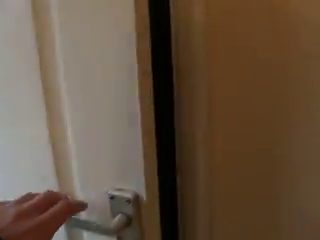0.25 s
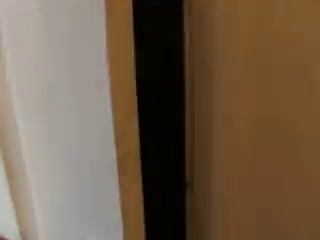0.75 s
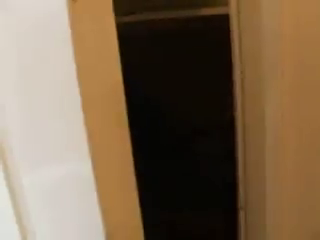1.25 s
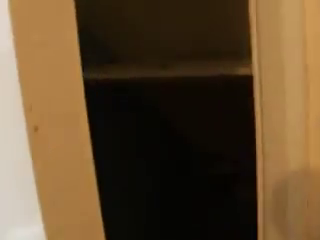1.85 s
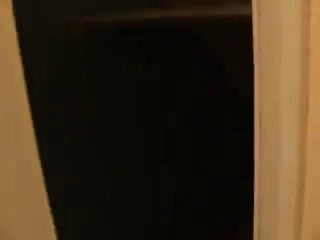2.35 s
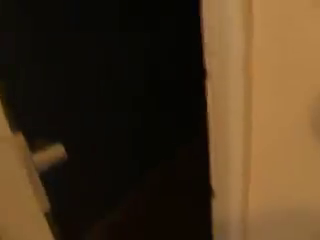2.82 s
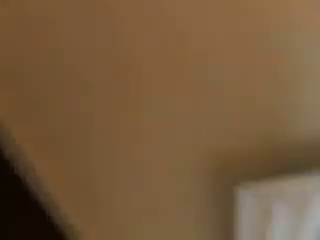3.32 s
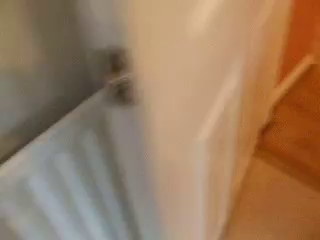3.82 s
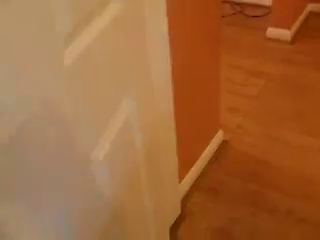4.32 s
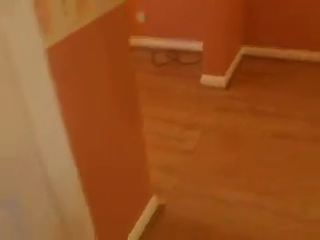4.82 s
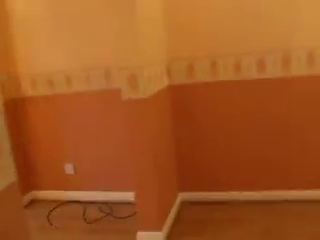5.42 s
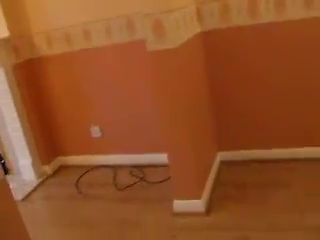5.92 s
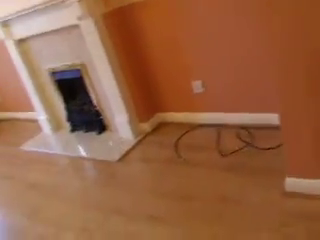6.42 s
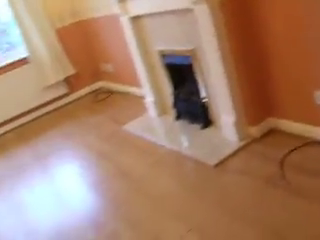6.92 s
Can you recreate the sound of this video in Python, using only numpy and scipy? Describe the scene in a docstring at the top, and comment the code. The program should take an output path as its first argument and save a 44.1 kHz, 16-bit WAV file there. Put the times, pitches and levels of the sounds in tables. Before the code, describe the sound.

Close to a handheld microphone, a metal door lever rubs and its latch snaps with a sharp, overloaded clack. The panel door bumps with small dry ticks. Cloth rustles and grip clicks follow as the person turns, then soft steps, a tiny sole squeak and a hollow heel knock on laminate, with slight indoor reverberation and faint hiss.

```python
"""In a small hall a lever handle is pressed, its latch snaps and a panel door swings; someone with a camera
then turns and walks onto a laminate floor. Rubs and the noisy tails of hits are swells of shaped noise, small
things tick through paired resonances or ring on one note, soft bumps are resonant noise, a sole squeaks in
slips, and the latch, door and heels ring as dying sines. The microphone hisses, dulls the treble and
overloads on the latch."""
import sys
import numpy as np
from scipy import signal
from scipy.io import wavfile
from scipy.ndimage import uniform_filter1d

SR = 44100
rng = np.random.default_rng(int(sys.argv[2]) if len(sys.argv) > 2 else 0)


def master(y):
    """Save y as 16-bit WAV."""
    cut = np.clip(np.atleast_2d(y).T, -1, 1)
    pcm = np.round(cut * 32767)  # scale
    wavfile.write(sys.argv[1], SR, pcm.astype(np.int16))


N = 315579  # length in samples


def gain_of(db):
    """Turns decibels into an amplitude factor."""
    return 10 ** (np.asarray(db) / 20)


def dying(t, t60):
    """Exponential decay that loses 60 dB in t60 seconds."""
    return gain_of(-60 * t / t60)


def evened(x):
    """Scales a sound to rms 1."""
    return x / np.sqrt(np.mean(x ** 2) + 1e-20)


def read(points, hz):
    """Reads a curve of straight lines on a log-frequency axis."""
    f, value = np.transpose(points)
    return np.interp(np.log(hz + 1), np.log(f + 1), value)


def add(mix, s, sound):
    """Mixes a sound in at s seconds, cut off at the end of the mix."""
    part = mix[round(s * SR):][:len(sound)]
    part += sound[:len(part)]


def band(x, hz, share):
    """One resonance around hz; share is its bandwidth over its centre frequency."""
    q = 1 / np.clip(share, 1 / 20, 2)
    b, a = signal.iirpeak(min(hz, SR / 3), q, SR)
    return signal.lfilter(b, a, x)


def noise(spectrum, patchy_db):
    """Random short-time spectra whose level drifts in patches of time and frequency; rms 1."""
    hz = np.fft.rfftfreq(512, 1 / SR)
    real, imaginary, patches = rng.standard_normal((N // 128 + 5, 257, 3)).T
    patches = uniform_filter1d(patches, size=7, axis=0)  # across frequency
    patches = evened(uniform_filter1d(patches, size=20, axis=1))  # across time
    level_db = read(spectrum, hz)[:, None] + patchy_db * patches
    z = (real + 1j * imaginary) * gain_of(level_db)
    return evened(signal.istft(z, nperseg=512, noverlap=384)[1][:N])


def ring(modes, tilt_db, scatter_db):
    """Dying sines, peak 1, tilted per octave; each blow lands on another spot, so the strengths scatter."""
    hz, db, t60 = np.transpose(modes)[:, :, None]
    t = np.arange(SR // 3) / SR
    spot_db = scatter_db * rng.standard_normal(hz.shape) + tilt_db * np.log2(hz / hz.mean())
    partials = gain_of(db + spot_db) * dying(t, t60) * np.sin(2 * np.pi * hz * t)
    sound = partials.sum(0)
    return sound / abs(sound).max()


def swell(t, s, db, rise, fall):
    """Power that climbs 24.7 dB in the rise time up to moment s, then sinks 24.7 dB in the fall time."""
    away = np.maximum((s - t) / abs(rise), (t - s) / abs(fall))
    return gain_of(2 * db - 49.4 * away)  # doubled decibels give power


def rubs_and_tails():
    """Grainy bright and mid noise swells with rubs and hits over a faint steady stir; a rumble lies below."""
    # spectra of the bright, cloth-like noise and the mid, sole-like noise: pitch_hz, relative level_db per Hz
    bright_spectrum = [(1180, -16.5), (2000, -38), (2260, 0.5), (4380, 4), (6080, 5), (7470, 6),
                       (8280, -2.5), (8890, -67.5), (9300, -41.5), (12100, -72), (20500, -120)]
    mid_spectrum = [(400, -2.5), (800, 3.5), (1100, 2.5), (1500, 4), (2000, 4.5), (2400, 0), (3100, 0),
                    (4000, -16)]
    # swells of bright and mid noise: rubs of clothes and soles, and noisy tails of hits:
    # peak_s, bright_db, mid_db, rise_s, fall_s
    swells = [(0.348, -33, -56, 0.01, 0.019), (0.396, -30.5, -32, 0.026, 0.017), (.42, -46, -56, .03, 0.26),
              (.63, -63, -46.5, 0.045, 0.1), (1.012, -39.5, -44.5, 0.016, 0.17),
              (1.064, -40, -49, 0.0087, 0.51), (1.909, -45, -60, .008, .2), (2.03, -44.5, -56, 0.12, 0.035),
              (2.565, -38.5, -53, 0.044, 0.13), (2.62, -34.5, -50, .02, 0.18),
              (2.66, -35.5, -45, 0.11, 0.15), (2.96, -41, -46.5, 0.13, 0.24),
              (3.16, -42.5, -44, 0.43, 0.55), (3.35, -60, -47, 0.14, 0.11), (3.496, -39.5, -47, .008, 0.18),
              (4.244, -37, -46, .03, 0.36), (4.3, -32.5, -37.5, 0.12, 0.3),
              (4.38, -32.5, -37.5, 0.25, 0.28), (4.74, -44.5, -45, 0.067, 0.3),
              (4.9, -49, -45.5, 0.26, 0.43), (5.01, -39, -39, 0.1, 0.026),
              (5.14, -30.5, -27.5, 0.046, 0.022), (5.16, -42, -45, 0.46, 0.23),
              (5.34, -36.5, -38.5, 0.35, .2), (5.48, -40.5, -42, 0.19, 0.16), (5.84, -45.5, -45, 0.14, 1),
              (6.25, -33, -37.5, 0.31, 0.73), (6.46, -37.5, -40, 0.38, 0.74),
              (6.606, -30.5, -52, .008, 0.23), (6.65, -36.5, -59, 0.07, 0.41),
              (7.041, -56, -45.5, 0.14, .5)]
    # faint steady rubbing under them: time_s, bright_db
    stir_levels = [(0, -46.5), (.15, -51.5), (.8, -56), (1.3, -55), (1.7, -50.5), (2.4, -54.5), (2.85, -49),
                   (3.8, -55.5), (4.15, -54), (4.6, -49.5), (5.6, -48.5), (6.8, -51), (7.16, -49.5)]
    # low rumbles as the camera is jolted: peak_s, level_db
    jolts = [(1.09, -42), (1.53, -52), (2.07, -46), (4.88, -49), (5.15, -53), (5.8, -52), (6.42, -46),
             (6.62, -51), (6.979, -59)]
    stir_mid_db = -2  # mid against bright noise in the steady rubbing
    jolt_rise_s, jolt_fall_s, rumble_db = 0.13, 0.2, -70

    t = np.arange(N) / SR
    coarse = np.arange(0, N + 32, 32) / SR  # levels move slowly enough for every 32nd sample
    stir = gain_of(2 * np.interp(coarse, *np.transpose(stir_levels)))
    bright_power = stir
    mid_power = stir * gain_of(2 * stir_mid_db)
    for s, bright_db, mid_db, rise, fall in swells:
        bright_power = bright_power + swell(coarse, s, bright_db, rise, fall)
        mid_power = mid_power + swell(coarse, s, mid_db, rise, fall)
    low_power = gain_of(2 * rumble_db)
    for s, db in jolts:
        low_power = low_power + swell(coarse, s, db, jolt_rise_s, jolt_fall_s)

    grain = gain_of(0.93 * evened(uniform_filter1d(rng.standard_normal(N), size=150)))
    bright = grain * noise(bright_spectrum, patchy_db=1.5)
    mid = grain * noise(mid_spectrum, patchy_db=1.66)
    below_45_hz = signal.butter(3, 45., fs=SR, output="sos")
    low = evened(signal.sosfilt(below_45_hz, rng.standard_normal(N)))
    layers = (bright_power, bright), (mid_power, mid), (low_power, low)
    return sum(np.interp(t, coarse, np.sqrt(power)) * x for power, x in layers)


def ticks():
    """A sharp tap and a puff of noise through two resonances; a body that rings long is narrow."""
    # small dry ticks of grip, clothes and boards: start_s, peak_db, body_hz, edge_hz, edge_over_body_db
    taps = [(0.1203, -23, 2030, 4500, -4), (.235, -28.5, 810, 1820, -19), (1.0082, -15, 2530, 5730, 3),
            (1.0092, -23.5, 1300, 4000, 4), (1.014, -27, 2770, 4900, -1), (1.0663, -17, 1060, 5550, 2),
            (1.0698, -15.5, 1050, 5900, 3), (1.0732, -18.5, 1040, 7200, 5), (1.1438, -24.5, 2060, 900, -11),
            (1.9073, -28, 2230, 6900, 5), (2.005, -23, 2110, 5500, 1), (2.514, -31, 2200, 6000, 3),
            (2.9373, -17, 700, 5630, 4), (3.115, -19, 1890, 4800, -7), (3.153, -25, 1950, 4140, 17),
            (3.4914, -21, 2140, 5770, 6), (3.4947, -17, 2130, 7050, -0.5), (3.573, -30, 1320, 5200, -3),
            (3.677, -35, 1060, 1980, -3), (3.722, -25, 720, 2900, -7), (4.132, -35, 500, 1100, -7),
            (4.2385, -23.5, 1740, 2800, -5), (4.308, -25, 700, 1200, -7), (4.479, -10.5, 4900, 5870, 4),
            (4.4807, -11.5, 3280, 6600, -4), (4.487, -23, 3800, 6800, 6), (4.694, -22, 2020, 1220, -15),
            (4.725, -25, 2030, 1120, -8), (4.836, -25, 2100, 4600, 2), (4.889, -24, 600, 2490, 3),
            (4.9128, -21.5, 1140, 2280, -3), (4.92, -22, 856, 1870, 1), (4.947, -26, 2500, 4000, -1),
            (5.1194, -20, 1500, 600, -8), (5.1305, -24, 2380, 6030, -18), (5.137, -22, 1300, 7040, -18),
            (5.1409, -11, 1400, 2600, 3), (5.223, -22.5, 1040, 2020, -1), (5.435, -27, 1200, 1890, -5),
            (5.458, -25, 1920, 1000, -9), (5.499, -24, 1580, 890, -4.5), (5.8064, -30, 3100, 3580, -6),
            (5.8959, -20.5, 1500, 815, -6), (5.987, -27, 704, 1830, -3), (6.056, -34.5, 690, 1490, -12),
            (6.0788, -22, 1580, 910, 6), (6.1439, -23.5, 790, 1710, -16), (6.242, -17, 2220, 3800, 3),
            (6.409, -21, 1510, 5000, 9), (6.6015, -24, 1350, 6000, 4), (6.8053, -20, 810, 1560, -32)]
    t60_s, t60_per_db = .018, 0.04  # decay time at -22 dB; softer ticks ring longer
    out, t = np.zeros(N), np.arange(SR // 8) / SR
    for s, db, body_hz, edge_hz, edge_db in taps:
        t60 = t60_s * np.exp(-t60_per_db * (db + 22))
        puff = rng.standard_normal(len(t)) * dying(t, t60)
        drive = puff + 13 * (t == 0)  # the tap is a single sample

        def resonance(hz):
            """Two resonances in a row on one pitch, the narrower the longer the decay."""
            narrow = band(drive, hz, min(14 / (hz * t60), .85))
            return evened(band(narrow, hz, min(30 / (hz * t60), 1.1)))

        sound = resonance(body_hz) + gain_of(edge_db) * resonance(edge_hz)
        add(out, s, gain_of(db) * sound / abs(sound).max())
    return out


def pings():
    """Small hard parts ring on one dying note whose strength wavers."""
    # single notes: start_s, level_db, pitch_hz, t60_s
    notes = [(.2345, -47, 810, 0.038), (1.9075, -39.5, 2280, 0.089), (2.01, -39.5, 1750, 0.087),
             (5.806, -31.5, 3035, 0.064), (5.8064, -36, 2980, 0.23), (5.8065, -34, 3550, .06)]
    out, t = np.zeros(N), np.arange(SR // 6) / SR
    for s, db, hz, t60 in notes:
        waver = 1 + 3.0 * uniform_filter1d(rng.standard_normal(len(t)), size=120)
        add(out, s, gain_of(db) * dying(t, t60) * waver * np.sin(2 * np.pi * hz * t))
    return out


def latch():
    """Each strike rings the lock case, with a short crack of loose parts."""
    # latch parts striking: start_s, level_db, bright_share (of the thin bright parts, 0-1)
    strikes = [(0.338, -30, 0), (0.3454, -42, 1), (0.347, -30, 1), (0.354, -31, .6), (0.3645, -15, 1),
               (0.368, -19, 0), (0.3837, 5, 0.63), (0.3867, -7, 0.6), (0.3947, -12, 0.6),
               (0.3956, -19, 0.7), (.4095, -26, 0.6)]
    # modes of the lock case: pitch_hz, relative level_db, t60_s
    lock = [(1490, -11, 0.033), (1830, -19, 0.021), (1970, 0, 0.024), (2340, 4.5, 0.019),
            (2512, 7.5, 0.029), (2590, 0, 0.036), (2850, -7, 0.042), (3150, -18, 0.017), (3820, -2, 0.02),
            (4000, -10, 0.034), (4890, -0.5, .016), (5500, -3, 0.014), (6210, -2.5, 0.019),
            (6620, -1, 0.013), (7800, -29, .01)]
    out, t = np.zeros(N), np.arange(SR // 3) / SR
    for s, db, bright in strikes:
        crack = 0.49 * band(rng.standard_normal(len(t)), 4500, 0.74) * dying(t, 0.016)
        case = ring(lock, tilt_db=22 * (bright - .5), scatter_db=1)
        add(out, s, gain_of(db) * (case + crack))
    # small parts radiate neither bass nor the top treble
    radiated = signal.butter(2, [1000., 7200.], "band", fs=SR, output="sos")
    return signal.sosfilt(radiated, out)


def thuds():
    """Noise in one resonance that swells briefly and dies; the door panel, knocked once, also rings."""
    # soft bumps and brushes, and noisy tails of the latch and ticks:
    # start_s, level_db, pitch_hz, rise_s, t60_s
    bumps_and_tails = [(0.454, -45, 232, 0.011, 0.64), (.458, -42.5, 465, 0.0028, 0.62),
                       (0.399, -43, 5900, .005, 0.46), (.603, -36.5, 1220, 0.017, 0.24),
                       (1.066, -34, 1140, 0.0036, 0.44), (1.068, -35.5, 634, 0.0031, 0.46),
                       (1.066, -35, 323, 0.0022, 0.52), (1.084, -38, 130, .015, 0.71),
                       (1.079, -34.5, 69, 0.0061, 0.61), (1.898, -42, 237, 0.0032, 0.57),
                       (1.906, -44, 2260, .003, 0.36), (2.0, -46.5, 377, 0.012, 0.39),
                       (2.009, -47, 1730, 0.003, 0.33), (2.561, -40, 806, 0.008, 0.71),
                       (2.621, -35.5, 1310, 0.023, 0.28), (2.935, -34.5, 600, 0.004, 0.34),
                       (2.939, -42, 330, 0.0073, 0.84), (2.949, -55, 109, 0.02, 0.84),
                       (3.236, -38, 657, 0.0056, 0.36), (3.319, -37.5, 1120, 0.012, 0.23),
                       (3.426, -36.5, 890, 0.007, 0.24), (3.493, -40.5, 2150, .003, 0.4),
                       (3.677, -41, 1010, 0.0042, 0.3), (4.049, -49.5, 282, 0.0035, 0.48),
                       (4.049, -41.5, 140, 0.0056, 0.22), (4.29, -39, 750, .03, 0.52),
                       (4.495, -44, 3180, .005, 0.43), (4.74, -48, 3140, 0.024, 0.75),
                       (4.88, -38, 205, 0.0028, 0.035), (4.971, -36.5, 3150, 0.013, 0.42),
                       (5.126, -33.5, 155, 0.0069, 0.055), (5.26, -33.5, 2950, 0.018, 0.27),
                       (5.301, -33, 1950, 0.036, 0.5), (5.319, -36, 99, 0.0037, 0.33),
                       (5.326, -34.5, 198, 0.0043, 0.44), (5.885, -35, 394, 0.0036, 0.06),
                       (6.268, -33, 220, 0.0031, 0.63), (6.604, -34.5, 1370, 0.0045, 0.48),
                       (6.605, -35, 3175, .005, 0.4), (6.995, -41, 600, 0.0049, 0.99),
                       (6.999, -41, 97, 0.023, 0.59)]
    # modes of the door panel: pitch_hz, relative level_db, t60_s
    door = [(80, 5.5, 0.24), (140.4, -1, 0.48), (260, -7.5, 0.62), (366, -10.5, 0.98), (695, -15, 0.75),
            (1050, -3, .2)]
    door_s, door_peak_db = 1.082, -24.5
    width_share, widest_hz = 0.78, 600  # resonance width follows pitch up to a limit
    out, t = np.zeros(N), np.arange(SR // 2) / SR
    for s, db, hz, rise, t60 in bumps_and_tails:
        share = min(width_share, widest_hz / hz)
        narrow = band(rng.standard_normal(len(t)), hz, share)
        body = evened(band(narrow, hz, 1.5 * share))
        onset = 1 - np.exp(-t / abs(rise))
        add(out, s, gain_of(db) * body * onset * dying(t, t60))
    add(out, door_s, gain_of(door_peak_db) * ring(door, tilt_db=0, scatter_db=1))
    return out


def squeak():
    """A sole sticks and slips: uneven slips about a millisecond apart, through the resonance of the sole."""
    # course of the squeak: time_s, level_db, slip_rate_hz
    course = [(5.124, -49, 970), (5.135, -28.5, 1100), (5.144, -22, 920), (5.147, -29, 1100),
              (5.152, -50, 1100)]
    s, db, rate = np.transpose(course)
    t = np.arange(s[0], s[-1], 1 / SR)
    jitter = 1 + 0.22 * uniform_filter1d(rng.standard_normal(len(t)), size=40)
    turns = np.cumsum(np.interp(t, s, rate) * jitter) / SR
    slips = np.diff(np.floor(turns), prepend=0)  # one click for each whole turn
    slips = slips * gain_of(1.4 * rng.standard_normal(len(t)))
    sole = evened(band(slips, 2180, 0.2) + 0.099 * band(slips, 1900, 0.42))
    out = np.zeros(N)
    add(out, s[0], gain_of(np.interp(t, s, db)) * sole)
    return out


def heels():
    """Hard knocks ring the laminate boards; a soft heel drives neither the lowest nor the highest notes."""
    # heel knocks: start_s, level_db (ahead of the heel's resonance)
    knocks = [(5.3212, -23), (6.2671, -8.5), (6.4709, -20.5)]
    # modes of the floor boards: pitch_hz, relative level_db, t60_s
    board = [(176, -17, 0.16), (220, -14, 0.27), (309.3, 3, 0.1), (342, -2, 0.14), (447, -0.5, 0.093),
             (514.5, -1, 0.13), (600, 0, 0.061)]
    out = np.zeros(N)
    for s, db in knocks:
        boards = ring(board, tilt_db=-5.0, scatter_db=1)
        add(out, s, gain_of(db) * band(boards, 340, 1.0))
    return out


def hall(x):
    """Reverberation from sparse taps of random sign, each band dying at its own speed."""
    # decay of the hall: pitch_hz, t60_s
    decay = [(100, 0.14), (500, 0.9), (2000, 0.34), (8000, 0.35)]
    taps = np.zeros(SR // 2)
    at = np.arange(200, len(taps) - 20, 20)  # one tap in every 20 samples
    taps[at + rng.integers(0, 20, len(at))] = rng.choice([-1., 1.], len(at))
    hz, t, z = signal.stft(taps, SR, nperseg=256)
    faded = z * dying(t, read(decay, hz)[:, None])
    tail = signal.istft(faded, SR, nperseg=256)[1]
    return signal.oaconvolve(x, tail / np.linalg.norm(tail))[:N]


def scene():
    """Hits with the hall behind them, over the thuds, rubs and noisy tails."""
    metal, small, knocks = latch(), ticks() + pings() + squeak(), heels()
    wet = hall(gain_of(-36.0) * metal + gain_of(-9.5) * small + gain_of(-10.0) * knocks)
    return (metal + small + knocks + wet + thuds() + rubs_and_tails())[None]


def record(dry):
    """Hiss and a dull capsule, a small offset, hard overload that spills treble, then the band limit."""
    # spectrum of the microphone hiss: pitch_hz, relative level_db per Hz
    hiss = [(15, 7), (25, 2), (60, 3.5), (150, -4), (400, 1.5), (1000, -3), (2900, -7), (6700, -9),
            (8100, -12), (9000, -40.5)]
    hiss_db, capsule_hz, edge_hz = -54.5, 8800, 16300  # hiss rms, then two low-pass corners
    hissing = dry + gain_of(hiss_db) * noise(hiss, patchy_db=2.5)
    capsule = signal.firwin(201, capsule_hz, window=("kaiser", 9), fs=SR)
    dull = signal.oaconvolve(hissing, capsule[None], "same")
    clipped = np.clip(dull - .0024, -.7, .7)
    band_limit = signal.firwin(255, edge_hz, window=("kaiser", 9), fs=SR)
    return signal.oaconvolve(clipped, band_limit[None], "same")


dry = scene()
out = record(dry)
master(out)
```